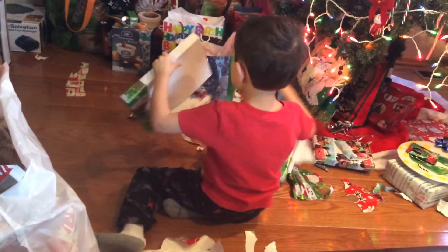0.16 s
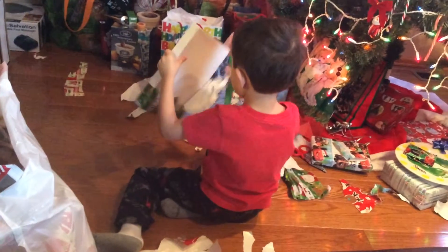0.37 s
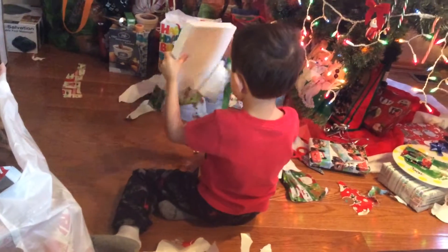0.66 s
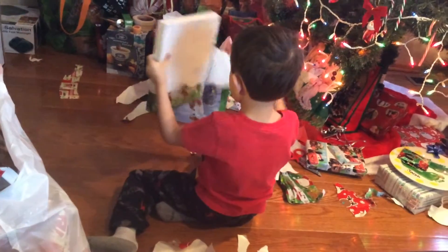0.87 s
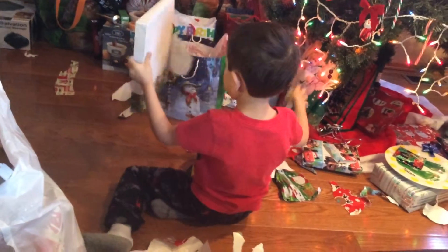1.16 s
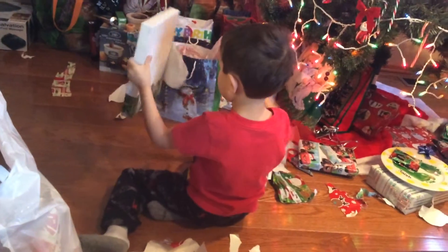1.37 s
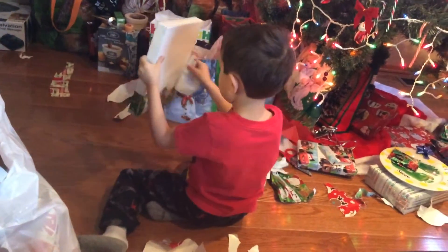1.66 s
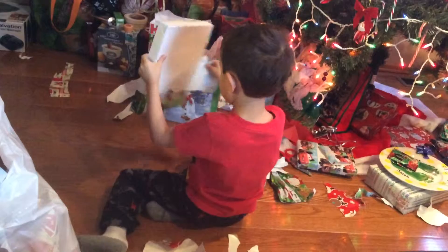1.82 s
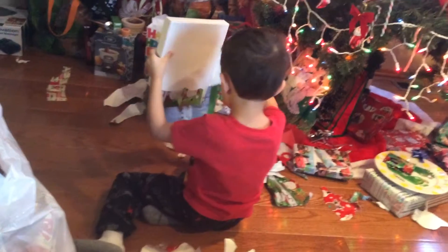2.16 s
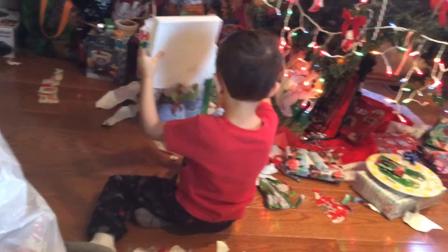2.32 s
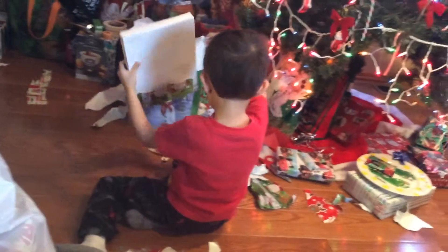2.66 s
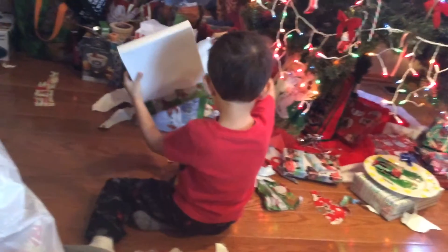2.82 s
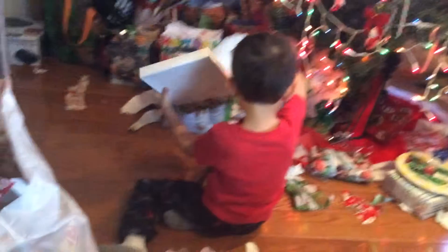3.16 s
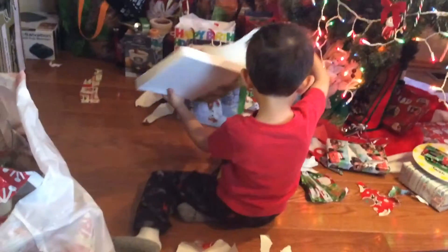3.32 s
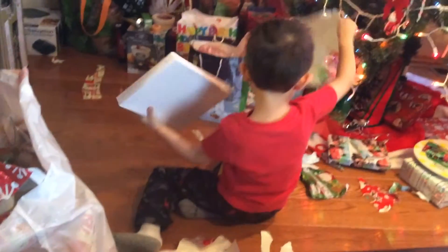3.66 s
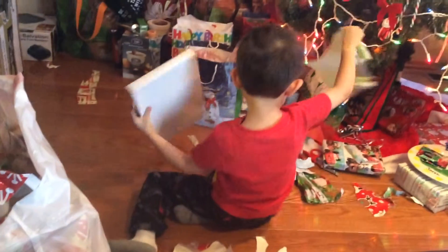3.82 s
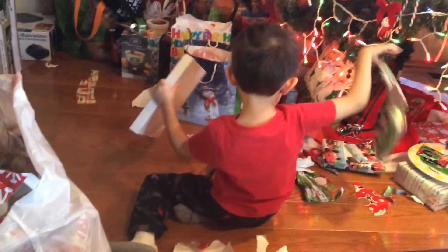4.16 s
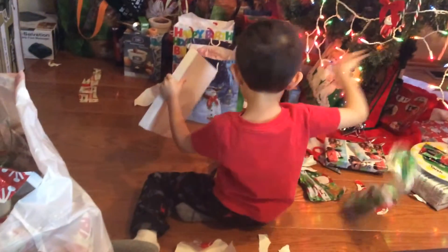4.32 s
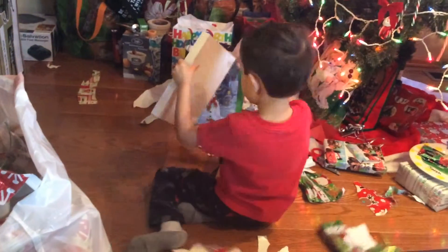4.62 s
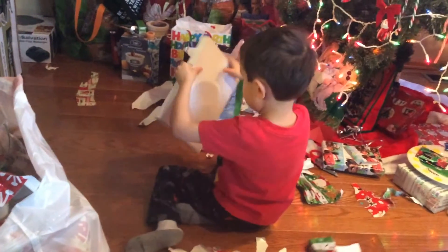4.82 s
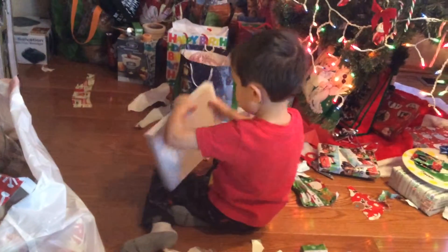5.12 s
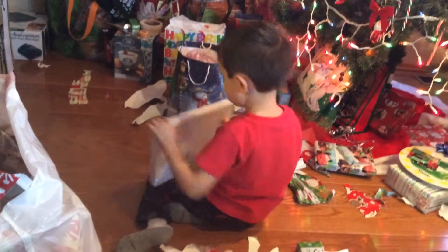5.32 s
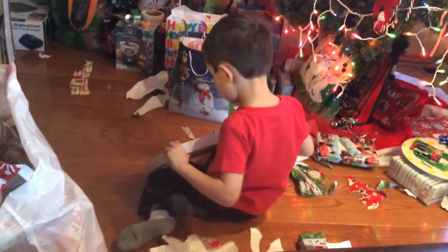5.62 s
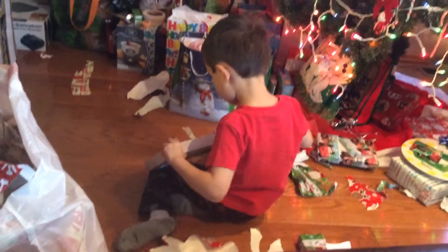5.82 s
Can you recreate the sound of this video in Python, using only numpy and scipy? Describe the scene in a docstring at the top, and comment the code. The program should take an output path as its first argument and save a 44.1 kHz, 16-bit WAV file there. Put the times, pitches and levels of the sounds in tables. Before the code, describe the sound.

In a living room with a low steady rumble and faint hum, a child unwraps a box. Paper flaps and crumples, creases snap, and short dry rips follow, strongest around three seconds. A torn strip slaps onto the floor, then the box is lowered with a tiny squeak, soft bumps and a click. A phone a couple of metres away picks up slight room echo.

```python
"""A child tears wrapping paper off a cardboard box in a living room, a couple of metres from a phone.
A low room rumble with an appliance hum and faint rubbing of the fingers run throughout; first the sheet
crumples and flaps, and creases snap. Then come the rips, runs of snapping fibres that drive the loose sheet,
with more crumpling between them. A torn strip lands on the floor; at the end the box squeaks, bumps and clicks
as it is lowered. Shaped noise and random clicks make the paper; a short room decay follows each sound."""
import sys
import numpy as np
from scipy import signal
from scipy.fft import rfft, irfft
from scipy.io import wavfile

SR = 44100
rng = np.random.default_rng(int(sys.argv[2]) if len(sys.argv) > 2 else 0)


def master(y):
    """Save y as 16-bit WAV."""
    cut = np.clip(np.atleast_2d(y).T, -1, 1)
    pcm = np.round(cut * 32767)  # scale
    wavfile.write(sys.argv[1], SR, pcm.astype(np.int16))


N = 263718
TIME = np.arange(N) / SR
FREQS = np.arange(N // 2 + 1) * SR / N + 1e-3  # Hz, kept above 0 for the logarithm

# Source levels below (rumble and hum apart) hold before the room adds its gain and echoes.
# Rumble spectrum of the house: [f/Hz, relative level/dB]
RUMBLE_SPECTRUM = [(20, -16), (45, -7), (70, -2), (130, 1), (220, 0), (300, -5), (420, -6), (650, -18),
                   (1200, -23), (2000, -30), (5000, -35), (10000, -33), (15500, -34)]
RUMBLE_DB, RUMBLE_SWAY_DB = -61, .5
# Appliance hum partials: [f/Hz, rms level/dB]
HUM_PARTIALS = [(59.2, -76), (220.7, -70.5)]

# Radiation spectrum of paper: [f/Hz, relative level/dB]
PAPER_SPECTRUM = [(60, -32), (120, -1.5), (300, -6), (400, 1.5), (550, 1), (900, 0), (1400, 3), (2700, 4.5),
                  (4100, 5.5), (5500, 1), (8000, -1.5), (10500, -1.5), (13000, -1), (15500, -7.5)]
# Fingers shifting on the paper: [start t/s, end t/s, level/dB]
GRIP_SHIFTS = [(0.034, 0.087, -69), (0.365, 0.697, -76), (1.186, 1.3, -71), (2.705, 3.014, -71.5),
               (3.85, 5.535, -73), (5.782, 5.98, -68)]
GRIP_FADE_S, HOLDING_DB = 0.046, -82.5  # a still hand is almost silent

# Sheet crumpling, flapping or landing: [t/s, level/dB, body re crinkle level/dB, fold f/Hz, length/s]
CRUMPLE_EVENTS = [(0.204, -58.5, 1, 4200, 0.06), (0.223, -36.5, -13, 3250, 0.016),
                  (0.327, -56.5, 2.5, 2200, 0.015), (0.446, -59, -2, 3400, 0.055),
                  (0.65, -46.5, -28, 2800, 0.026), (1.138, -61, -9.5, 2850, 0.06),
                  (1.46, -56.5, -6.5, 3800, 0.028), (1.479, -58, -7, 2040, 0.054),
                  (1.671, -57.5, 2.5, 2400, 0.022), (2.178, -59, -8, 6000, 0.018),
                  (2.198, -37.5, -6, 4730, 0.0082), (2.253, -41.5, -9, 5500, 0.014),
                  (2.621, -58, -1.5, 1800, 0.021), (2.74, -51, -8, 2370, 0.041),
                  (2.819, -50.5, 0, 4500, 0.035), (2.892, -51, -16, 2270, 0.028),
                  (3.011, -54, 6, 1500, 0.031), (3.594, -49, 1, 1430, 0.015),
                  (3.802, -55.5, -5, 2440, 0.03), (3.956, -61.5, -2, 2400, 0.076),
                  (4.093, -52, -5.5, 2870, 0.021), (4.163, -60, -6, 1980, 0.066),
                  (4.389, -38, -9, 3480, .014), (4.397, -37, -8.5, 1690, 0.031),
                  (4.435, -42.5, -12, 1700, 0.01), (4.602, -43, -1.5, 2220, 0.021),
                  (5.057, -76.5, 16, 1700, 0.032), (5.597, -59, -2, 2200, 0.039),
                  (5.796, -70, 5, 4200, 0.062)]
CRUMPLE_RISE_S, BUCKLE_FLUTTER_DB = 0.0071, 2.6
FOLD_DB, FOLD_WIDTH = 5, .35  # resonance level, and bandwidth as a share of the fold pitch
SIZZLE_DB, SIZZLE_AT_HZ, SIZZLE_DB_PER_OCTAVE = -8, 2860, 8  # smaller folds sizzle more

# Creases buckling or tape letting go, and last the box's click as it is set down, sounded the same way: [t/s,
# level/dB, facet f/Hz]
SNAP_EVENTS = [(0.4964, -44, 7000), (0.5147, -44, 2800), (0.5456, -42, 5600), (0.6427, -40, 4700),
               (0.7, -44, 5200), (0.7478, -35, 3400), (0.7582, -40, 6200), (0.7717, -39, 2000),
               (0.7849, -30, 4500), (0.7955, -28, 5800), (1.6915, -48, 3100), (1.7315, -38, 2800),
               (1.7598, -45, 2700), (1.8109, -35, 5200), (1.8286, -38, 3800), (1.8685, -38, 5500),
               (1.8841, -29, 6500), (1.8913, -33, 2400), (3.678, -54, 2900), (4.0681, -56, 2100),
               (4.7588, -62, 6400), (5.823, -50, 4200)]
FACET_CYCLES, CRACK_S = 3.9, .0007  # time constants of the decays, in cycles and in s
SETTLE_DB, SETTLE_S, SETTLE_BODY_DB = -7.5, 0.018, -15.5  # after a snap the paper around it settles

# Pulls: [t/s, attack/s, hold/s, level/dB, sag over the hold/dB, body re crinkle level/dB,
#         fibre sizzle re crinkle level/dB, stutter share of power/1]
PULLS = [(0.774, 0.0068, 0.044, -36.5, 1.5, -11.5, 0.5, 0.58),
         (0.822, 0.034, 0.084, -37, 2.5, -9, 4.5, 0.04), (1.701, 0.013, 0.091, -51, 4, -21, -15, 0.97),
         (1.801, 0.0027, .056, -44, -0.5, -11, -4, 1), (1.885, 0.0018, 0.1, -43, 8, -11.5, 6, 0),
         (3.016, 0.11, 0.13, -39, 27, -3.5, 2, 0.35), (3.203, 0.023, 0.042, -30.5, -0.5, -12.5, -0.5, 0.25),
         (3.346, 0.016, 0.052, -39.5, 8, -11.5, -5, 0.2), (3.404, .035, 0.0062, -43, -3, -13.5, -1.5, 0.45),
         (3.493, 0.014, 0.011, -46.5, -2, -18.5, -10, 0.65)]
RIP_RELEASE_S = .015  # the last fibres let go
JERK_DB, JERK_S = 15, 0.013  # each pull first jerks the whole sheet taut
FIBRES_PER_S, FIBRE_SPREAD_DB, FIBRE_HISS = 1000, 1.9, .17
STUTTERS_PER_S, STUTTER_SPREAD_DB = 280, 1.5

# Box edge sounds, a squeak near 900 Hz, then a short bright click near 4 kHz:
# [t/s, length/s, f/Hz, half-width as a share of f/1, level before the swell/dB]
BOX_EDGE_SOUNDS = [(5.596, .034, 915, .04, -50), (5.819, .025, 4250, .08, -50)]
# Box set down: [t/s, level/dB]
BOX_BUMPS = [(5.637, -57), (5.648, -57.5), (5.825, -62)]
# Resonant modes of the box: [f/Hz, bandwidth/Hz, relative level/dB]
BOX_MODES = [(268, 260, 8), (490, 58, 4), (970, 42, -15), (1610, 60, -23), (2720, 170, -8)]

# Reverberation time of the room's diffuse tail: [f/Hz, T60/s]
REVERBERATION = [(200, .46), (1000, .48), (4000, .44), (8000, .35), (15000, .27)]
EARLY_S = .017  # amplitude time constant of the early echoes
TOP_HZ = 15700


def undb(db):
    """A level in decibels corresponds to the amplitude ratio 10^(dB/20)."""
    return 10 ** (np.asarray(db) / 20)


def unit(x):
    """Division by the root mean square normalises a signal to rms 1."""
    return x / np.sqrt(np.mean(x ** 2) + 1e-30)


def on_freqs(points):
    """Linear interpolation on a log-frequency axis joins (f/Hz, value) points."""
    hz, value = np.transpose(points)
    return np.interp(np.log(FREQS), np.log(hz), value)


def colour(x, points):
    """Minimum phase: folding the cepstrum makes a causal filter of a (f/Hz, level/dB) spectrum."""
    cepstrum = irfft(np.log(undb(on_freqs(points))), N)
    cepstrum[1:N // 2] *= 2
    cepstrum[N // 2 + 1:] = 0
    response = np.exp(rfft(cepstrum))
    return irfft(rfft(x) * response, N)


def band(x, lo_hz, hi_hz, order=2):
    """A Butterworth band-pass is maximally flat between its two cutoffs."""
    cutoffs = [lo_hz, min(hi_hz, SR / 2 - 100)]
    return signal.sosfilt(signal.butter(order, cutoffs, "band", fs=SR, output="sos"), x)


def ring(x, hz, width_hz):
    """A second-order resonance responds with gain 1 at its centre and decays faster when wider."""
    return signal.lfilter(*signal.iirpeak(hz, hz / width_hz, fs=SR), x)


def add(out, s, x):
    """Superposition: the sound x is summed into out from time s."""
    start = max(int(s * SR), 0)
    out[start:start + len(x)] += x[:N - start]


def wander(lo_hz, hi_hz):
    """Band-limited noise of rms 1 forms a random drift between two rates."""
    spectrum = rfft(rng.standard_normal(N))
    return unit(irfft(spectrum * (FREQS > lo_hz) / (1 + (FREQS / hi_hz) ** 4), N))


def room_tone():
    """Stationary noise of falling spectrum sways slightly in level; steady sinusoids add the hum."""
    rumble = unit(colour(rng.standard_normal(N), RUMBLE_SPECTRUM))
    air = rumble * undb(RUMBLE_DB + RUMBLE_SWAY_DB * wander(1, 4.5))
    hum = np.zeros(N)
    for hz, db in HUM_PARTIALS:
        hum += np.sqrt(2) * undb(db) * np.sin(2 * np.pi * (hz * TIME + rng.random()))
    return air + hum


def fractures(per_s, spread_db):
    """Fracture is a random point process: clicks of either sign, mostly small and a few large; rms 1."""
    happens = rng.random(N) < per_s / SR
    size = undb(spread_db * np.minimum(rng.exponential(size=N), 3.5))
    return unit(happens * size * rng.choice([-1, 1], N))


def crackle(per_s, spread_db, hiss, patchy_db):
    """Facets of each size snap independently in their own band; flexing favours now one size, now another."""
    edges = np.geomspace(350, 20000, 8)
    out = np.zeros(N)
    for lo, hi in zip([60, *edges], edges):
        facets = fractures(per_s, spread_db) + hiss * rng.standard_normal(N)
        out += band(facets, lo, hi) * undb(patchy_db * wander(15, 55.5))
    return unit(out)


def sheet(force):
    """A driven sheet radiates in three ranges, each of rms 1: its broad body, its crinkles and its fibres."""
    sound = colour(force, PAPER_SPECTRUM)
    ranges = [(90, 1200), (1200, 7000), (7000, 20000)]  # Hz
    return np.array([unit(band(sound, lo, hi, order=4)) for lo, hi in ranges])


def handling(body_db=-8, sizzle_db=-6, shift_db=0.5):
    """Friction of shifting fingers excites faint rubbing and crinkling that comes and goes."""
    body, crinkle, sizzle = sheet(crackle(per_s=150, spread_db=1, hiss=1.0, patchy_db=5.0))
    rub = undb(HOLDING_DB)
    for start, end, db in GRIP_SHIFTS:
        inside_s = np.minimum(TIME - start, end - TIME)  # negative outside the shift
        rub = np.maximum(rub, undb(db) * np.clip(1 + inside_s / GRIP_FADE_S, 0, 1))
    rub = rub * undb(shift_db * wander(5.4, 28.0))
    return rub * (undb(body_db) * body + crinkle + undb(sizzle_db) * sizzle)


def buckling():
    """Flexed paper buckles in a dense, fluttering crackle, radiated as body, crinkles and fibres."""
    force = crackle(per_s=800, spread_db=1.0, hiss=0.26, patchy_db=1.0)
    return sheet(force * undb(BUCKLE_FLUTTER_DB * wander(55, 320)))


def shower(buckles, s, body_db, hz, length_s):
    """A fold sets off a short shower of small buckles, which excite the resonance of the adjoining facet."""
    t = TIME[:SR // 8]
    start = int(s * SR)
    body, crinkle, sizzle = buckles[:, start:start + len(t)]
    fold = unit(crinkle + undb(FOLD_DB) * ring(crinkle, hz, FOLD_WIDTH * hz))
    sizzle_db = SIZZLE_DB + SIZZLE_DB_PER_OCTAVE * np.log2(hz / SIZZLE_AT_HZ)
    swell = np.minimum(t / CRUMPLE_RISE_S, 1) * np.exp(-(t / length_s) ** 2)
    return swell * (undb(body_db) * body + fold + undb(sizzle_db) * sizzle)


def crumples():
    """Buckling under load: the loose sheet folds, flaps and lands, with one shower of buckles each time."""
    out, buckles = np.zeros(N), buckling()
    for s, db, body_db, hz, length_s in CRUMPLE_EVENTS:
        add(out, s, undb(db) * shower(buckles, s, body_db, hz, length_s))
    return out


def snaps(crack=0.74):
    """Snap-through: a crack (its share of power given) and a few facet cycles, then the paper settles."""
    out, t, buckles = np.zeros(N), TIME[:SR // 200], buckling()
    for s, db, hz in SNAP_EVENTS:
        facet = np.sin(2 * np.pi * hz * t) * np.exp(-t * hz / FACET_CYCLES)
        noise = band(rng.standard_normal(len(t)), hz / 4, 2 * hz, order=1)
        split = noise * np.exp(-t / CRACK_S)
        snap = np.sqrt(1 - crack) * unit(facet) + np.sqrt(crack) * unit(split)
        add(out, s, unit(snap) * undb(db))
        add(out, s, undb(db + SETTLE_DB) * shower(buckles, s, SETTLE_BODY_DB, hz, SETTLE_S))
    return out


def rips(catch_db=-1.5):
    """Successive fracture: a tear runs through fine fibres or stutters between bundles, then lets go."""
    fibres = crackle(FIBRES_PER_S, FIBRE_SPREAD_DB, FIBRE_HISS, patchy_db=3.0)
    fine = sheet(fibres * undb(catch_db * wander(27, 140)))
    coarse = sheet(fractures(STUTTERS_PER_S, STUTTER_SPREAD_DB))
    out, t = np.zeros(N), TIME[:SR // 3]
    for s, attack_s, hold_s, db, sag_db, body_db, sizzle_db, stutter in PULLS:
        now = slice(int(s * SR), int(s * SR) + len(t))
        body, crinkle, sizzle = np.sqrt(1 - stutter) * fine[:, now] + np.sqrt(stutter) * coarse[:, now]
        attack = np.minimum(t / attack_s, 1)
        hold = undb(db - sag_db * np.clip((t - attack_s) / hold_s, 0, 1))
        release = np.exp(-np.maximum(t - attack_s - hold_s, 0) / RIP_RELEASE_S)
        jerked_body = undb(body_db + JERK_DB * np.exp(-t / JERK_S)) * body
        add(out, s, attack * hold * release * (jerked_body + crinkle + undb(sizzle_db) * sizzle))
    return out


def box(contact_s=0.0026):
    """Band-limited noise with a brief swell gives a squeak and a click; soft scuffing blows excite modes."""
    out, t = np.zeros(N), TIME[:SR // 8]
    for s, length_s, hz, spread, db in BOX_EDGE_SOUNDS:
        noise = band(rng.standard_normal(len(t)), hz * (1 - spread), hz * (1 + spread))
        swell = np.sin(np.pi * np.minimum(t / length_s, 1))
        add(out, s, undb(db) * swell * unit(noise))
    for s, db in BOX_BUMPS:
        push = rng.standard_normal(len(t)) * np.exp(-t / contact_s)
        body = sum(undb(mode_db) * ring(push, hz, width) for hz, width, mode_db in BOX_MODES)
        add(out, s, unit(body) * undb(db))
    return out


def echoes(early_db=-1, tail_db=-3, gap_s=0.001, damp_hz=8000, size=256):
    """Reflection: floor and furniture return early echoes; a diffuse tail dies soonest in the treble."""
    t = TIME[:int(SR * .6)]
    early = rng.standard_normal(len(t)) * np.exp(-t / EARLY_S)
    hz, s, frames = signal.stft(rng.standard_normal(len(t)), SR, nperseg=size)
    t60 = np.interp(hz, *np.transpose(REVERBERATION))
    decay = np.exp(-np.log(1000) * s / t60[:, None])  # 60 dB down after T60
    tail = signal.istft(frames * decay, SR)[1][:len(t)]
    tail = band(unit(tail), 55, damp_hz, order=1)
    arrived = np.clip(t / gap_s - 1, 0, 1)  # silent for one gap, full after two
    return arrived * (undb(early_db) * unit(early) + undb(tail_db) * tail) / np.sqrt(len(t))


def room(dry, level_db=-2, count=3):
    """Convolution: the sound shifts between spots on the moving sheet, each with its own pattern of echoes."""
    spots = np.array([wander(2, 21.5) for _ in range(count)])
    spots /= np.sqrt(np.sum(spots ** 2, axis=0))  # the squared shares sum to 1
    reflected = sum(signal.fftconvolve(dry * share, echoes())[:N] for share in spots)
    return undb(level_db) * (dry + reflected)


def scene():
    """Superposition of paper and box, heard through the room, on the steady room tone."""
    sources = handling() + crumples() + snaps() + rips() + box()
    return (room_tone() + room(sources))[None]


def record(dry, low_cut_hz=45):
    """Band limitation: the phone thins the deep bass and cuts the top."""
    thinned = signal.sosfilt(signal.butter(2, low_cut_hz, "high", fs=SR, output="sos"), dry)
    return signal.sosfilt(signal.ellip(10, .2, 80, TOP_HZ, fs=SR, output="sos"), thinned)


dry = scene()
out = record(dry)
master(out)
```